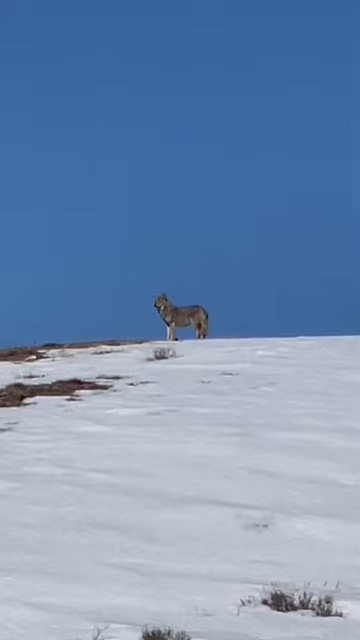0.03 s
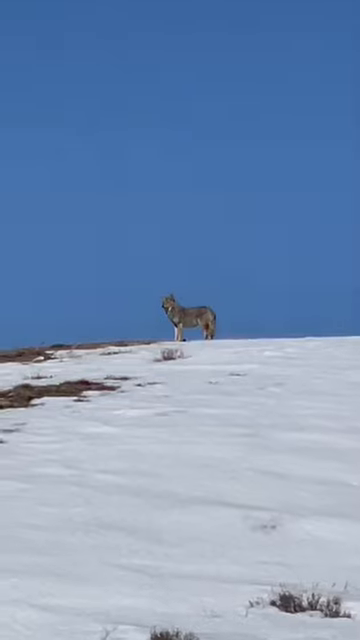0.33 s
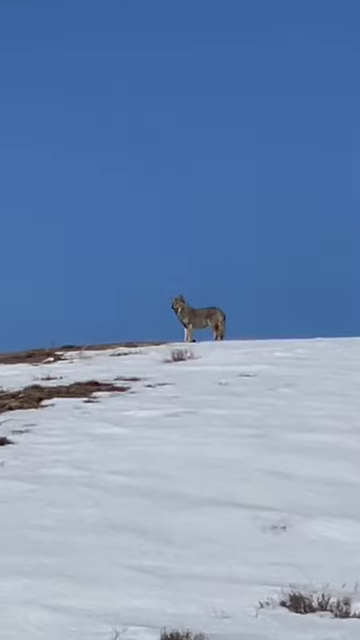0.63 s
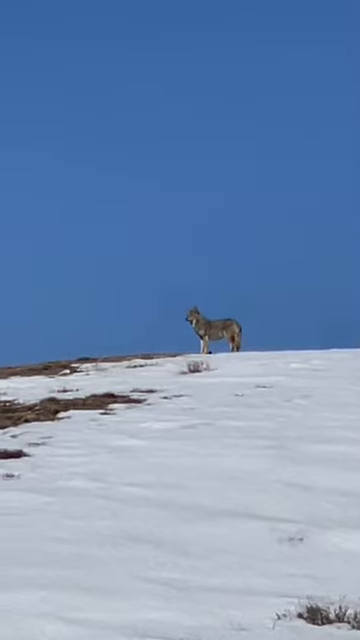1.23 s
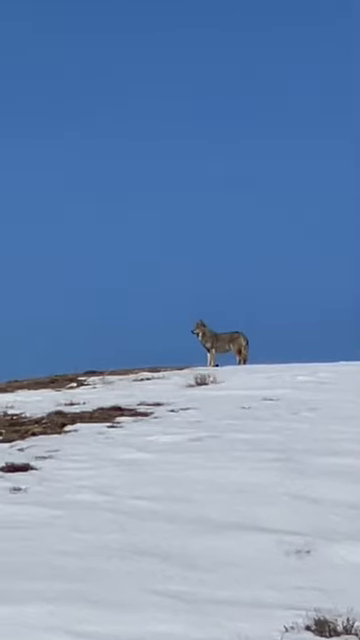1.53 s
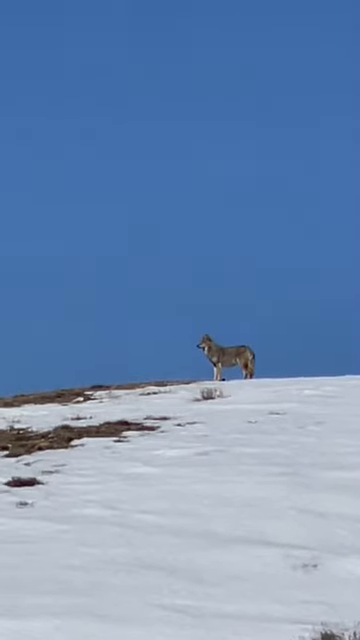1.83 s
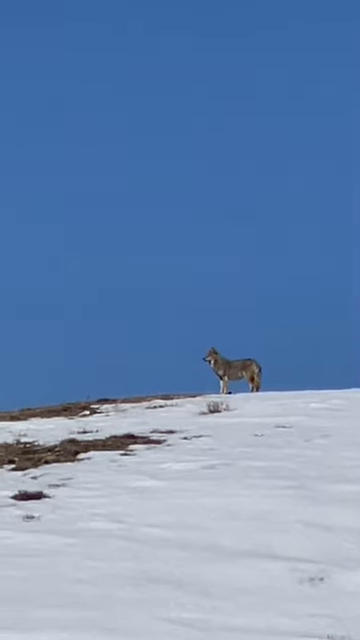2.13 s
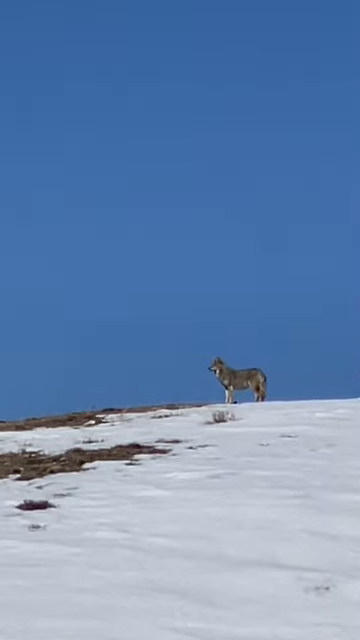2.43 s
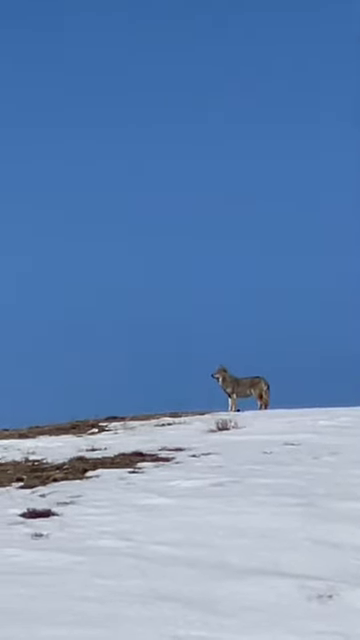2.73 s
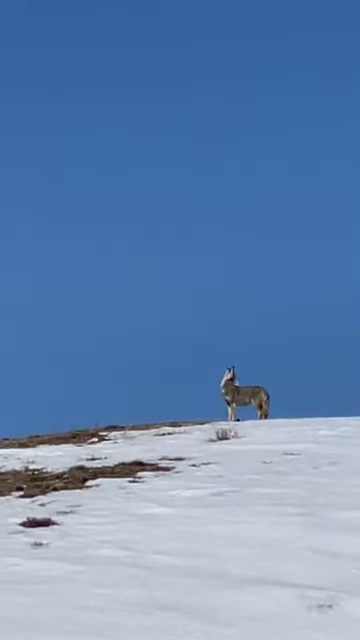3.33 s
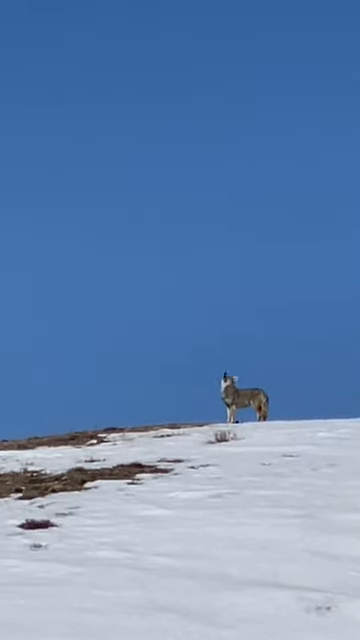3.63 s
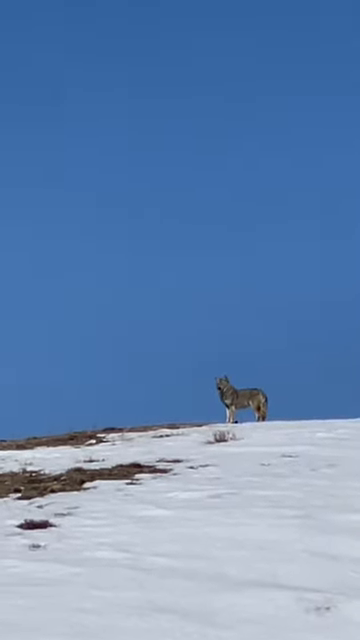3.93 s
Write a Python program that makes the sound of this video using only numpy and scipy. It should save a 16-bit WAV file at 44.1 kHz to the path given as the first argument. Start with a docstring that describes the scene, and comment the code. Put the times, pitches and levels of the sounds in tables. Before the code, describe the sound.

A coyote gives three short yips over a faint, distant helicopter thudding.

```python
"""Low rumble and the hiss of open air come first, with something far off, probably a helicopter rotor:
each blade sends a push and a suction, about 19 thuds a second, beside a faint whine of several tones.
Three seconds in, a coyote on a snowy ridge, straight ahead of the stereo microphone, gives three short
yips, the first a rasping bark. Each is an arch of pitch, its harmonics shaped by throat and mouth.
A small scuff, likely on snow, sounds near the microphone at the end."""
import sys
import numpy as np
from scipy import signal
from scipy.fft import rfft, irfft
from scipy.io import wavfile
from scipy.ndimage import uniform_filter1d

SR = 44100
rng = np.random.default_rng(int(sys.argv[2]) if len(sys.argv) > 2 else 0)


def file_out(sig):
    """Save sig as 16-bit WAV at sys.argv[1]."""
    # one column per channel
    cols = np.atleast_2d(sig).T
    # limit, then scale
    lim = np.clip(cols, -1, 1)
    pcm = np.round(lim * 32767).astype(np.int16)
    wavfile.write(sys.argv[1], SR, pcm)


N = 176400
BIN_HZ = np.arange(N // 2 + 1) * SR / N


def undb(db):
    """Decibels to gain."""
    return 10 ** (np.asarray(db) / 20)


def unit(x):
    """Scale to an rms of 1."""
    return x / np.sqrt(np.mean(x ** 2))


def gain_at(hz, curve):
    """Gain of a (frequency [Hz], level [dB]) curve on a log-frequency axis."""
    curve_hz, db = np.array(curve, float).T
    return undb(np.interp(np.log(np.maximum(hz, 1)), np.log(curve_hz), db))


def lowpass(hz):
    """Gain per frequency bin, falling away above hz."""
    return 1 / (1 + (BIN_HZ / hz) ** 4)


def noise(colour):
    """Noise of the given colour, rms 1."""
    return unit(irfft(rfft(rng.standard_normal(N)) * gain_at(BIN_HZ, colour), N))


def drift(hz):
    """Smooth random motion up to about this rate, rms 1."""
    return unit(irfft(rfft(rng.standard_normal(N)) * lowpass(hz), N))


def flutter(t, per_s):
    """Random values at a given rate, joined by straight lines."""
    return np.interp((t - t[0]) * per_s, np.arange(256), rng.standard_normal(256))


# Open air at the microphone, common to both sides and differing (frequency [Hz], relative level [dB])
AIR_COMMON = [(22, -28.5), (60, 1), (110, -1.5), (190, -0.5), (260, -6.5), (350, -14.5), (500, -19.5),
              (800, -25), (1200, -29.5), (1650, -29.5), (2200, -32), (2550, -33), (3300, -37.5),
              (4150, -41), (4600, -51), (5300, -43.5), (7000, -50.5), (9000, -48), (10200, -65.5),
              (11400, -51.5), (12600, -68)]
AIR_DIFFERENCE = [(22, -12), (55, 2.5), (160, -3.5), (260, -1), (400, -4), (620, -5), (900, -13),
                  (1400, -16), (2200, -31), (2650, -29), (3400, -30.5), (4600, -49), (8400, -75),
                  (9700, -31.5), (11000, -42), (12000, -48)]


def open_air():
    """Distant rumble and hiss in octave bands that swell together; the upper ones also flicker alone."""
    mid = rfft(noise(AIR_COMMON)) * undb(-47)
    side = rfft(noise(AIR_DIFFERENCE)) * undb(-56.5)
    mid += side * .51 * lowpass(603)  # low wind noise is stronger at the left microphone port
    ports = np.array([mid + side, mid - side])
    swell_db = .37 * drift(hz=1)
    octave = np.log2(np.maximum(BIN_HZ, 20) / 20)
    out = 0
    for k in range(11):
        band = irfft(ports * np.maximum(1 - abs(octave - k), 0), N)
        flicker_db = (1.2 if k >= 5 else 0) * drift(hz=18.4)
        out += band * undb(swell_db + flicker_db)
    return out


def rotor(t):
    """Far off, each blade makes a push, then a suction; the air on the way varies strength and arrival."""
    blade_hz, scatter_db = 19.277, 2
    push_lead_s, push_s, suction_s = .0048, .0017, .0021
    late_s = .0009 * drift(hz=1)
    thuds = np.zeros(N)
    for when in np.arange(.0334, t[-1], 1 / blade_hz):
        push, suction = undb(scatter_db * rng.standard_normal(2))
        near = slice(max(int((when - 1 / blade_hz) * SR), 0), int((when + 1 / blade_hz) * SR))
        age = t[near] - when - late_s[int(when * SR)]
        thuds[near] += .84 * push * np.exp(-.5 * ((age + push_lead_s) / push_s) ** 2)
        thuds[near] -= suction * np.exp(-.5 * (age / suction_s) ** 2)
    echo = .4 * np.exp(-2j * np.pi * BIN_HZ * .02157)  # about 22 ms behind
    low_cut = 1 - lowpass(29.4)
    return undb(-35.5) * irfft(rfft(thuds) * (1 + echo) * low_cut, N)


# Tones of the whine in the distance (frequency [Hz], level [dB])
WHINE_TONES = [(1040, -78), (1733, -81.5), (1873, -81.5), (2148, -81.5), (2466, -77.5), (2757, -83.5),
               (3368, -89.5)]


def whine():
    """Faint high tones far away, each wavering in pitch and level."""
    out = 0
    for hz, db in WHINE_TONES:
        phase = 2 * np.pi * np.cumsum(hz * (1 + .00784 * drift(hz=34.7))) / SR
        fade_db = 3 * drift(hz=16)
        out += undb(db) * unit(np.sin(phase) * undb(fade_db))
    return out


# Resonances of the coyote's throat and mouth (frequency [Hz], gain [dB])
THROAT_RESONANCES = [(400, 11), (750, -3), (1080, 4), (1520, -2), (1680, -1.5), (1900, -11), (2300, -13),
                     (2550, -19.5), (2930, -17), (3300, -40), (4100, -27), (5000, -32.5), (6000, -38),
                     (8800, -39.5), (10000, -54)]


def mouth_gain(hz, pitch_hz, bright_db, top_db):
    """An opening mouth lifts a band of overtones; as the pitch sinks it closes, leaving one resonance."""
    lift_db = bright_db * np.interp(hz, (1480, 1850, 3200, 3930), (0, 1, 1, 0))
    shelf_db = top_db * np.interp(hz, (3200, 3930), (0, 1))
    closed = np.interp(pitch_hz, (372, 470), (1, 0))
    closed_db = -4.5 * closed * abs(np.log2(hz / 1250))
    return gain_at(hz, THROAT_RESONANCES) * undb(lift_db + shelf_db + closed_db)


# Breath in the call, hiss through the open jaws, sharper forced hiss (frequency [Hz], relative level [dB])
BREATH_COLOUR = [(300, -11), (800, 1), (1150, -3.5), (1700, -1.5), (2000, -12.5), (2900, -12), (3400, -12),
                 (3750, -30), (4200, -29), (4700, -40), (7000, -45)]
JAW_HISS = [(3000, -35), (4800, -14.5), (5900, 3.5), (7000, -6), (9000, -7), (10300, -25), (12000, -23)]
FORCED_HISS = [(5000, -32), (6500, 0), (7400, 2), (8800, -13), (9600, -15), (10200, -28), (11500, -17)]
# Where a call, at its peak, breaks into strong-weak cycles (start [s], end [s], share [0-1])
PERIOD_DOUBLING = [(3.228, 3.263, 0.9), (3.488, 3.514, 0.01)]


def yip(t, contour, top_db):
    """One call: harmonics shaped by the mouth; rasp makes cycles uneven and adds breath; hiss on top."""
    def glide(x):
        """Smooth over 2 ms."""
        return uniform_filter1d(x, int(.002 * SR))

    times, *columns = np.array(contour, float).T
    pitch_hz, base_db, over_db, bright_db, rasp, hiss_db = (glide(np.interp(t, times, c)) for c in columns)
    gate = glide(1. * ((t > times[0]) & (t < times[-1])))
    jitter = .00236 * drift(hz=121)
    phase = 2 * np.pi * np.cumsum(pitch_hz * (1 + jitter)) / SR
    uneven_rad = 1.3 * rasp * np.tanh(drift(hz=200))
    doubling = glide(sum(share * ((t > start) & (t < end)) for start, end, share in PERIOD_DOUBLING))
    puffs = (1 + .81 * np.cos(phase / 2)) * (1 + .5 * np.cos(phase))  # stronger on every other cycle
    breath = noise(BREATH_COLOUR) * puffs * (undb(-35) + rasp * undb(-2.5))
    force = undb(hiss_db + 65)  # the sharper hiss takes over above -65 dB
    hiss = undb(hiss_db) * (noise(JAW_HISS) + force * noise(FORCED_HISS))
    on, overtones = gate > 1 / SR, np.zeros(N)
    for k in np.arange(2, 16, .5):
        hz = k * pitch_hz[on]
        # strong-weak cycles move the energy of the upper overtones to the half lines between them
        share = 1 if k == 2 else doubling[on] if k % 1 else 1 - doubling[on]
        gain = mouth_gain(hz, pitch_hz[on], bright_db[on], top_db) * np.sqrt(abs(share))
        shimmer_db = 8.5 * np.minimum(hz / 3000, 1) ** 2 * np.tanh(flutter(t[on], per_s=54.3))
        # the highest overtones dissolve into hiss
        blur_rad = .89 * np.interp(hz, (2200, 5500), (0, 1)) * flutter(t[on], per_s=230)
        rasp_rad = min(k - 1, 2.5) * uneven_rad[on]
        overtones[on] += gain * undb(shimmer_db) * np.sin(k * phase[on] + rasp_rad + blur_rad)
    voiced = np.sqrt(2) * (undb(base_db) * np.sin(phase) + undb(over_db) * overtones)
    return gate * (voiced + undb(over_db) * breath + hiss)


# The three calls from the ridge (time [s], pitch [Hz], fundamental level [dB],
# overtone level before throat and mouth [dB], brightness [dB], rasp [0-1], jaw hiss level [dB])
BARK_CONTOUR = [(3.173, 410, -64.5, -83, 6, .5, -95), (3.188, 458.3, -38.5, -56, 5, 1, -75),
                (3.21, 546.5, -36.5, -43.5, 1, 0.57, -69.5), (3.225, 584, -33, -43.5, 8.5, 1, -68),
                (3.242, 629, -34.5, -44, 3.5, 0.87, -64), (3.256, 638, -34.5, -39.5, 2.5, 0.02, -68),
                (3.269, 615, -43.5, -40.5, 3, 0.2, -70), (3.284, 558, -47.5, -49, 9.5, 0.2, -71),
                (3.298, 456, -62, -61.5, 3, .12, -75), (3.335, 336, -75, -74, 11, .1, -87)]
HIGH_YIP_CONTOUR = [(3.397, 319, -77, -74, -4, 0.052, -95), (3.432, 421, -52.5, -58.5, 5, .1, -88),
                    (3.447, 542, -46.5, -43, -6, 0.28, -76), (3.46, 638.6, -40, -43, -5, .06, -67),
                    (3.476, 694.4, -42, -39, 1, .05, -67), (3.49, 761, -40, -38, -2.5, .04, -79),
                    (3.504, 792, -37, -34, -9, .04, -77), (3.512, 804, -41, -30.5, -16, .04, -80),
                    (3.53, 675.5, -59, -48, 9.5, .04, -72), (3.55, 522.5, -69, -53.5, -3, .06, -73),
                    (3.559, 401.5, -61, -58, 7, 0.066, -80), (3.598, 300.3, -70, -64, -7, .06, -84),
                    (3.63, 278, -69, -75, -1, .06, -93), (3.667, 298, -72, -66, -1, .06, -84)]
LAST_YIP_CONTOUR = [(3.676, 318.2, -75, -65, -7, .046, -80), (3.691, 353.6, -67, -58.5, -21, 0.055, -82),
                    (3.714, 439.6, -46.5, -54, 2, 0.073, -79), (3.732, 531, -45.5, -41, -9, 0.031, -77),
                    (3.75, 634.4, -43, -42.5, -8, .033, -73), (3.769, 693, -51, -38, -8, 0.027, -73),
                    (3.782, 716, -55, -40.5, -13, .03, -75), (3.801, 614, -66, -46, 8, .033, -72),
                    (3.812, 508, -56, -54.5, -1, .06, -74), (3.824, 386, -70, -59, 5, .06, -72),
                    (3.842, 335, -81, -59.5, -3, .06, -74), (3.865, 286, -76, -75, 0, .06, -80)]


def coyote(t):
    """Three yips from straight ahead of the microphone, with a faint tail scattered off the snowy slope."""
    slope_db, slope_t60_s, slope_delay_s, right_lag_s = -20, .3, .01, .00002
    voice = yip(t, BARK_CONTOUR, top_db=-8)
    voice += yip(t, HIGH_YIP_CONTOUR, top_db=-6.5)
    voice += yip(t, LAST_YIP_CONTOUR, top_db=-13)
    tail = rng.standard_normal(N) * undb(-60 * t / slope_t60_s) * (t > slope_delay_s)
    left = voice + undb(slope_db) * signal.fftconvolve(voice, tail / np.linalg.norm(tail))[:N]
    right = irfft(rfft(left) * np.exp(-2j * np.pi * BIN_HZ * right_lag_s), N)
    return np.array([left, right])


# Colour of the scuff near the microphone (frequency [Hz], relative level [dB])
SCUFF_COLOUR = [(200, -6), (700, 3), (1400, -15), (2800, -15), (4000, -14.5), (5500, -22), (9000, -32),
                (11000, -55)]


def scuff(t):
    """A brief soft crunch close by, likely on snow: noise that rises fast and dies away."""
    peak_s, attack_s, decay_s = 3.956, .0065, .022
    age = t - peak_s
    envelope = np.exp(-np.maximum(-age / attack_s, age / decay_s))
    return undb(-52.5) * noise(SCUFF_COLOUR) * envelope


def scene():
    """Rotor, whine and open air in the distance, the coyote ahead, the scuff close by."""
    t = np.arange(N) / SR
    balance = undb([[-.115], [.115]])  # left, right
    distance = (rotor(t) + whine() + open_air()) * balance
    return distance + coyote(t) + scuff(t)


def record(dry):
    """The microphone opens after a moment; the top is cut steeply."""
    opens_s, top_hz = .036, 12600
    fade_in = np.clip((np.arange(N) / SR - opens_s) / .002, 0, 1)
    return signal.sosfilt(signal.ellip(8, .2, 70, top_hz, fs=SR, output="sos"), dry * fade_in)


dry = scene()
out = record(dry)
file_out(out)
```